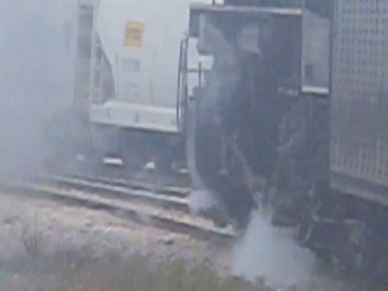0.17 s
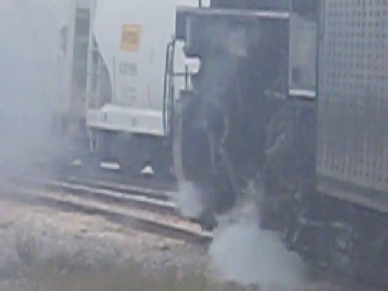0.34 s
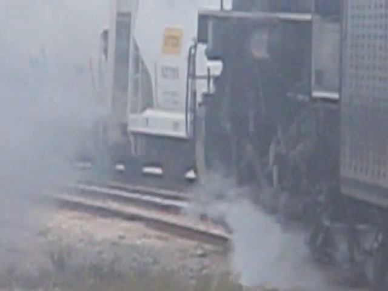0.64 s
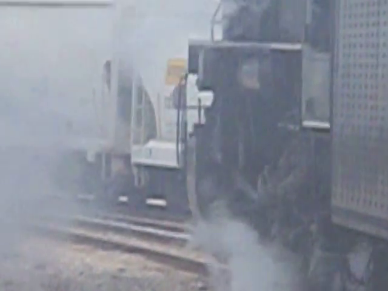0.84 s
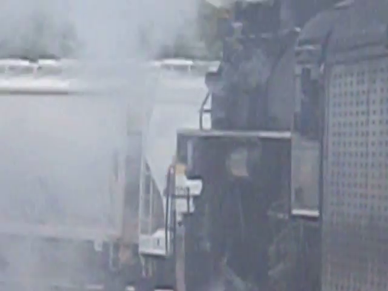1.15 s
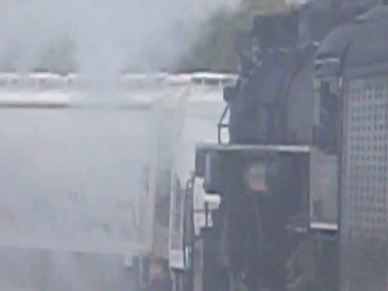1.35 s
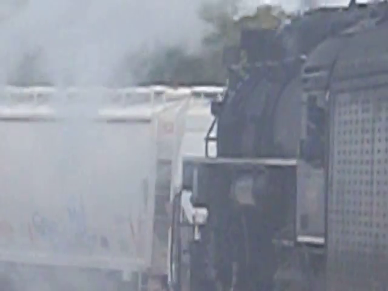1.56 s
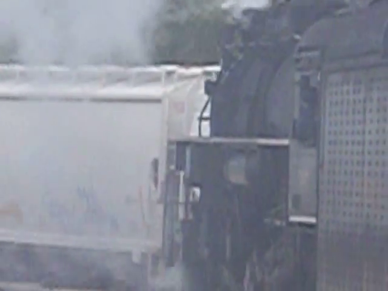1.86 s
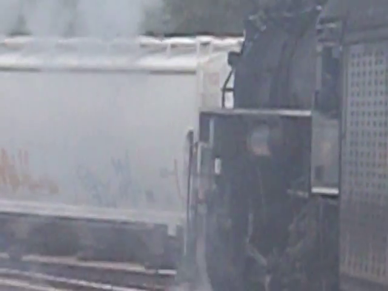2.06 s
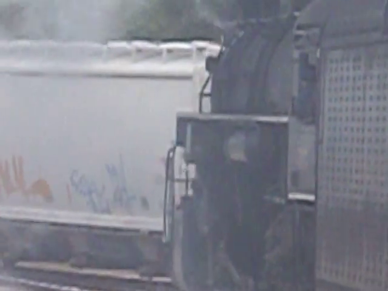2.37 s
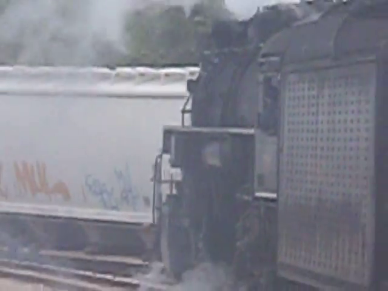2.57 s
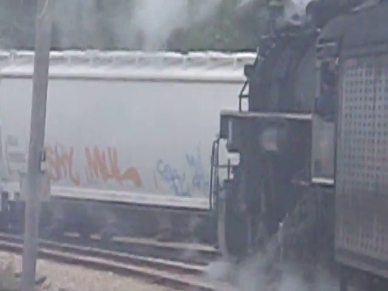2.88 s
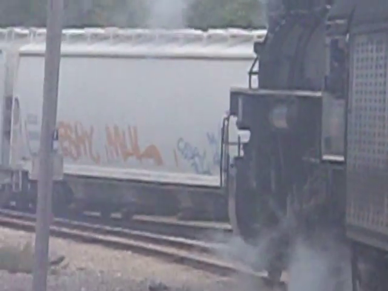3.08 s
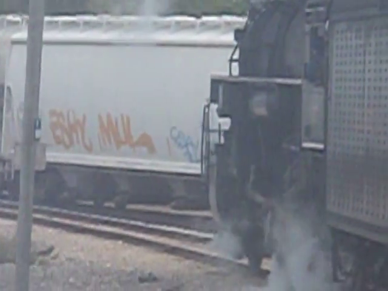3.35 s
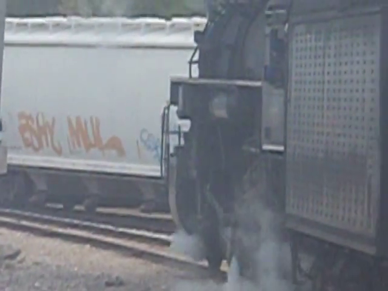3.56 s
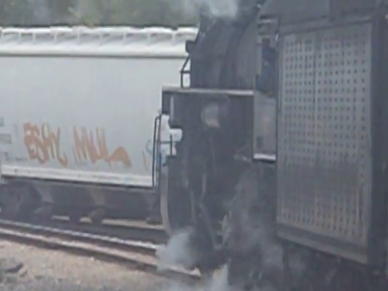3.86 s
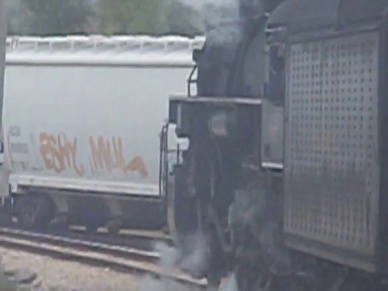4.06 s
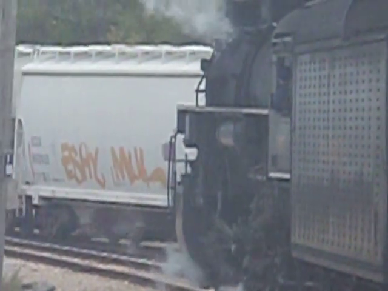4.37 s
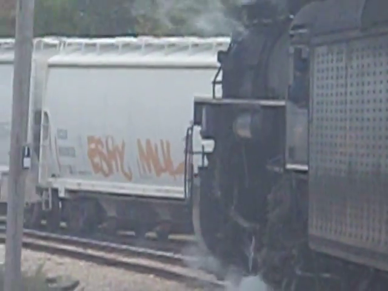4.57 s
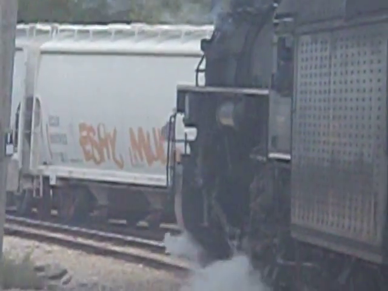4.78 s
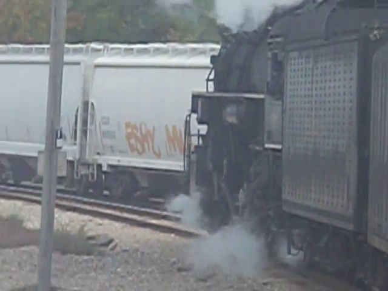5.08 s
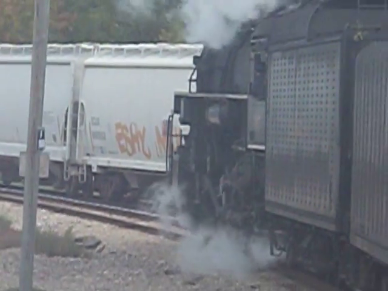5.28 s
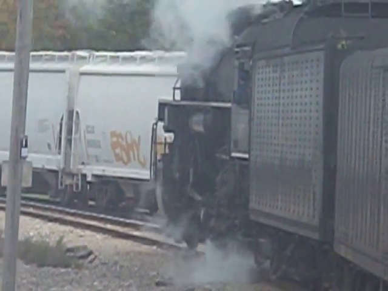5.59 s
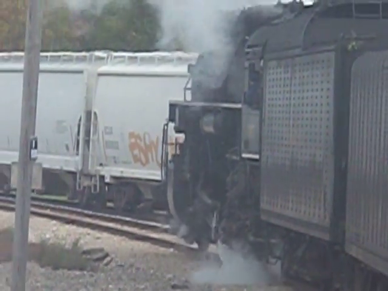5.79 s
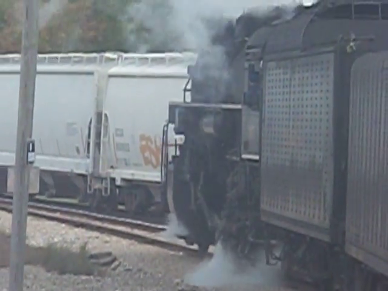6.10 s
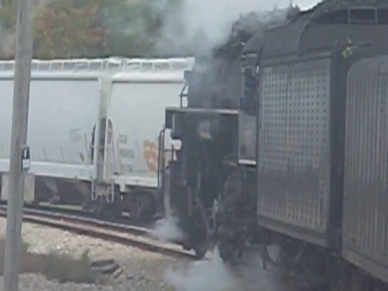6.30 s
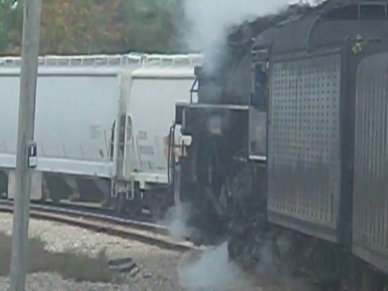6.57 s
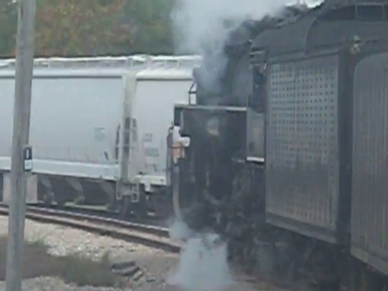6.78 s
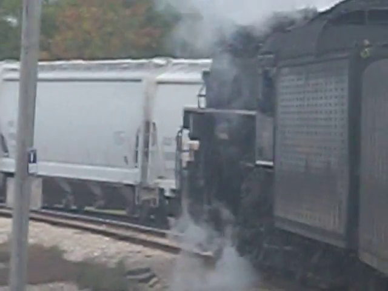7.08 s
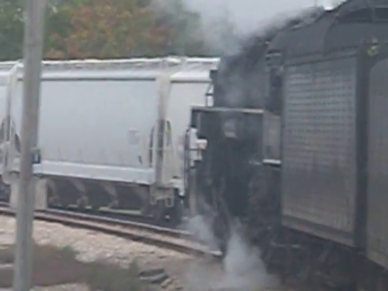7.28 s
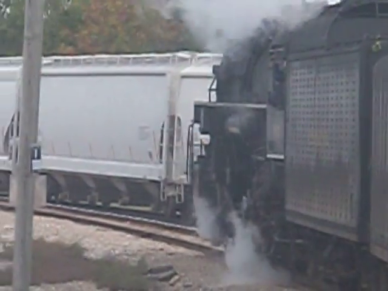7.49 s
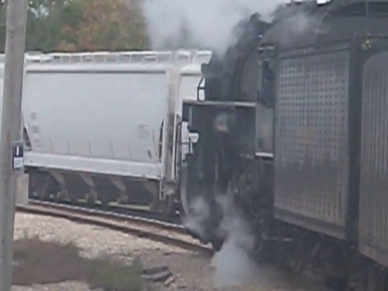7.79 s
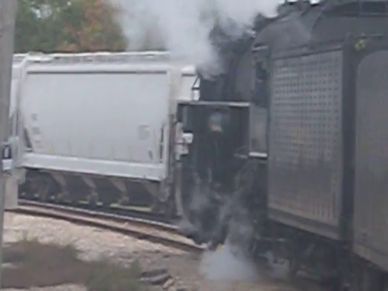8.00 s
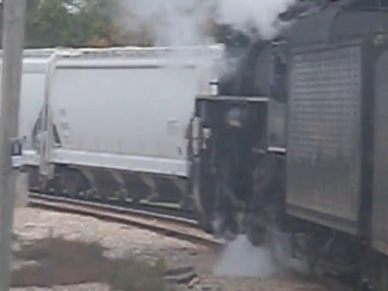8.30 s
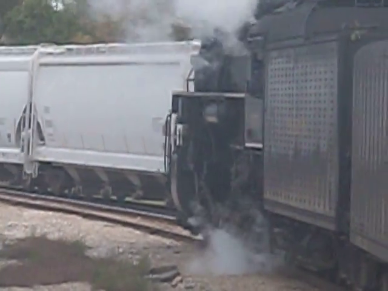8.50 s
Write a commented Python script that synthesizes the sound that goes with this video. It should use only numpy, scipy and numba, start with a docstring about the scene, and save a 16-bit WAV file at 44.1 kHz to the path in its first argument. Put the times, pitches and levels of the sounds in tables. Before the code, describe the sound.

Slow steam engine on curved track: grainy rumble, bright hissing puffs, a high wavering wheel squeal, irregular dull knocks and clinks, wind thumping the microphone.

```python
"""Steam locomotive on a yard curve

One microphone in gusty air hears a steam locomotive creep round a curve in a rail yard.
Wind, rolling and steam are flickering bands of noise; the flange squeal is wavering, blurred tones.
Low thumps of pressure are wind buffets and the low bodies of some knocks. Rods, joints and loose parts
knock, chirp, clink, snap and squeak as short pulses and damped notes.
The whole level dips briefly at set moments, and the left channel lags by a twelfth of a millisecond."""
import sys
import numpy as np
from scipy import signal
from scipy.fft import rfft, irfft, next_fast_len
from scipy.io import wavfile
from scipy.ndimage import uniform_filter1d
from numba import njit

SR = 44100
rng = np.random.default_rng(int(sys.argv[2]) if len(sys.argv) > 2 else 0)


def pcm_store(signal):
    """Save signal as 16-bit PCM."""
    levels = np.round(np.clip(np.atleast_2d(signal), -1, 1) * 32767)
    wavfile.write(sys.argv[1], SR, levels.astype(np.int16).T)


N = 381465  # samples


def undb(db):
    """Decibels to gain."""
    return 10 ** (np.asarray(db) / 20)


def unit(x):
    """Scale to rms 1."""
    return x / np.sqrt(np.mean(x ** 2))


def smooth(x, samples):
    """Two running means in a row."""
    return uniform_filter1d(uniform_filter1d(x, samples), samples)


def curves(table):
    """Columns of a table joined by straight lines in time."""
    times, *columns = np.transpose(table)
    return [np.interp(np.arange(N) / SR, times, column) for column in columns]


@njit
def svf(x, hz, width_hz):
    """State-variable band-pass, gain 1 at the centre."""
    y, band, low = np.empty(len(x)), 0., 0.
    g, damping = np.tan(np.pi * hz / SR), width_hz / hz
    for i in range(len(x)):
        v = (band + g * (x[i] - low)) / (1 + g * (g + damping))
        band, low, y[i] = 2 * v - band, low + 2 * g * v, damping * v
    return y


def walk(rate_hz):
    """Random levels held 1 / rate_hz s and slewed twice; spread near 1."""
    hold = int(SR / rate_hz)
    steps = np.repeat(rng.standard_normal(N // hold + 1), hold)
    return 1.2 * smooth(steps, hold)[:N]


def turbulence(colour, grains_per_s, scatter_db, grain_db, flicker_db, flicker_hz):
    """Noise and uneven grains through third-octave bands that flicker together and alone."""
    colour_hz, colour_db = np.transpose(colour)
    sizes = undb(scatter_db * np.minimum(rng.exponential(size=N), 5.5))
    grains = (rng.random(N) < grains_per_s / SR) * sizes * np.sign(rng.standard_normal(N))
    grains = undb(grain_db) * unit(grains)
    out, shared = 0, walk(flicker_hz)
    octaves = np.log2(colour_hz[-1] / colour_hz[0])
    for f in colour_hz[0] * 2 ** np.arange(0, octaves, 1 / 3):
        band = svf(svf(rng.standard_normal(N) + grains, f, 0.5 * f), f, 0.5 * f)
        band_db = np.interp(np.log(f), np.log(colour_hz), colour_db)
        band_db = band_db + flicker_db * (shared + 0.72 * walk(1.5 * flicker_hz))
        out = out + undb(band_db) * band
    return unit(out)


def swells(rows, rise_s, fall_s, base_db):
    """Gain of a base level plus events that rise, hold and die away, added as power."""
    power, t = undb(base_db) ** 2 + np.zeros(N), np.arange(SR) / SR
    for start_s, length_s, db in rows:
        fall = np.exp(-np.clip(t - length_s, 0, 1) / fall_s)
        shape = np.clip(t / rise_s, 0, 1) * fall
        i = max(int(start_s * SR), 0)
        power[i:i + SR] += (undb(db) * shape[:N - i]) ** 2
    return np.sqrt(power)


def tone(hz, waver_hz, throb_db, rough):
    """A self-excited mode whose pitch wavers and whose level flutters; slip noise blurs it."""
    phase = 2 * np.pi * np.cumsum(hz + waver_hz * walk(60)) / SR
    blur = rough * unit(smooth(rng.standard_normal((2, N)), 260))
    swing = undb(throb_db * walk(60)) + blur[0] + 1j * blur[1]
    return unit((swing * np.exp(1j * phase)).imag)


def ring_fade(t, t60_s, rise_s):
    """A soft onset and an exponential decay by 60 dB in t60_s."""
    return np.exp(-np.log(1000) * t / t60_s) * (1 - np.exp(-t / rise_s))


def bursts(table, rough, spread, glide):
    """Short notes that swell, glide up through their pitch and fade, partly noise around it."""
    out = np.zeros(N)
    for start_s, length_s, hz, db in table:
        t = np.arange(int(length_s * SR)) / SR
        hiss = unit(svf(rng.standard_normal(SR // 4), float(hz), spread * hz))[-len(t):]
        note = np.sin(2 * np.pi * hz * t * (1 + glide * (t / length_s - 1) / 2))
        swell = np.sin(np.pi * (t / length_s) ** 0.69) ** 0.93
        i = int(start_s * SR)
        out[i:i + len(t)] += undb(db) * swell * (note + rough * hiss)
    return out


# uneven wind level under the low thumps: start_s, level_db
WIND_LEVEL = [(0, -16.5), (.08, -17), (.19, -26), (.28, -19), (.65, -16.5), (1.17, -17.5), (1.3, -20),
              (1.8, -19.5), (2.3, -18.5), (2.5, -21), (2.85, -18), (3.3, -16), (3.7, -21), (4.2, -17),
              (4.55, -13), (4.8, -25), (4.96, -13.5), (5.06, -16), (5.13, -18.5), (5.85, -20.5), (6.0, -19),
              (6.85, -18), (7.1, -19), (7.55, -20), (7.93, -17.5), (8.09, -29.5), (8.65, -17.5)]
# spectrum of the wind: frequency_hz, level_db (per Hz, relative)
WIND_COLOUR = [(20, -1), (58, 0.8), (92, -1), (142, -3), (250, -4), (400, -14.5), (900, -25)]
# low thumps of pressure, wind buffets and the low bodies of some knocks:
# centre_s, level_db, pitch_hz, direction (push 1, pull -1)
THUMPS = [(.0305, -7, 200, 1), (0.0621, -6.7, 184, 1), (0.089, -6, 219, 1), (0.2876, -4, 191, 1),
          (0.5358, -1, 197, -1), (0.5603, -9, 125, -1), (0.603, -9, 118, 1), (0.6718, -3, 102, -1),
          (0.843, -4, 120, -1), (0.9404, -5.5, 188, 1), (1.139, -6, 184, 1), (1.1774, -3.5, 149, -1),
          (1.268, -10, 132, -1), (1.6927, -2.5, 206, 1), (2.2865, -6.5, 168, 1), (2.9028, -0.5, 233, -1),
          (3.0094, -11, 160, 1), (3.2559, -9, 121, 1), (3.2936, -7, 125, 1), (3.356, -4, 106, -1),
          (3.433, -5, 180, -1), (3.8087, -7.5, 167, -1), (3.9803, -9, 110, 1), (4.1645, -9, 241, -1),
          (4.212, -2.5, 212, -1), (4.29, -9.1, 168, 1), (4.3142, -2.5, 132, -1), (4.4035, -2, 100, 1),
          (4.426, -8, 185, -1), (4.4513, -5, 189, 1), (4.507, -10, 107, 1), (4.5347, 4, 110, -1),
          (4.5425, -5, 220, 1), (4.5765, -6, 190, -1), (4.647, -7, 131, 1), (4.557, -6, 198, 1),
          (4.6352, -4.5, 205, -1), (4.6836, -9, 128, 1), (4.9594, -2, 262, -1), (4.9959, -8, 148, -1),
          (5.0295, -6, 117, 1), (5.0564, -5, 119, -1), (5.996, -8, 197, -1), (6.0501, -7, 248, -1),
          (6.1708, -9, 145, 1), (6.3226, -8, 116, -1), (6.348, -7.5, 195, 1), (6.4725, -2.5, 132, -1),
          (6.6613, -7.5, 86.5, -1), (6.795, -6, 83, 1), (6.8856, -7, 142, -1), (7.366, -4, 149, -1),
          (7.4454, -7.1, 178, 1), (7.5426, 1, 208, -1), (7.598, -6.5, 180, 1)]
# the low noise swells around each thump: level against the thump, lead, hold and decay
THUMP_DB, THUMP_RISE_S, THUMP_HOLD_S, THUMP_FALL_S = -18, .015, .02, 0.022


def wind_and_thumps():
    """Lumpy low turbulence, with lone pushes and pulls of pressure for buffets and some knocks' bodies."""
    around = [(s - THUMP_RISE_S, THUMP_HOLD_S, db + THUMP_DB) for s, db, hz, way in THUMPS]
    gain = swells(around, THUMP_RISE_S, THUMP_FALL_S, curves(WIND_LEVEL)[0])
    out = gain * turbulence(WIND_COLOUR, 130, 1.6, 0.95, 1.3, 30)
    for centre_s, db, hz, way in THUMPS:
        u, i = np.pi * hz * np.arange(-1000, 1000) / SR, int(centre_s * SR)
        out[i - 1000:i + 1000] += np.sign(way) * undb(db) * (1 - 1.5 * u ** 2) * np.exp(-u ** 2)
    return out


# the train at the microphone, under its knocks and puffs: start_s, rolling_db, steam_db
TRAIN_LEVELS = [(0, -23, -21), (1.0, -24, -18.5), (2.0, -21, -20), (2.22, -23.5, -16), (2.4, -21.5, -18.5),
                (2.9, -25.5, -20), (4.1, -19.5, -20), (4.45, -34, -22), (4.64, -35, -26.5),
                (4.67, -18, -28), (4.72, -20, -18.5), (5.05, -37, -23.5), (5.36, -22, -21.5),
                (5.55, -20.5, -17.5), (5.75, -18, -18), (6.2, -22.5, -19), (6.6, -23.5, -20),
                (7.3, -22.5, -20), (7.9, -22, -16.5), (8.1, -30.5, -17), (8.22, -23, -18.5),
                (8.65, -21.5, -18)]
# spectrum of the rolling wheels: frequency_hz, level_db (per Hz, relative)
ROLLING_COLOUR = [(60, -9.5), (150, -7.5), (300, -4), (600, -4), (1000, -8.5), (1700, -12), (3000, -18)]
# every knock shakes the rolling noise: level against the knock, swell, hold and decay
SHAKE_DB, SHAKE_RISE_S, SHAKE_HOLD_S, SHAKE_FALL_S = -15, 0.004, 0.012, 0.024


def rolling():
    """Wheels rumble on the rail as grainy low noise that swells with every knock."""
    shakes = [(s, SHAKE_HOLD_S, db + SHAKE_DB) for s, db, hz in KNOCKS]
    gain = swells(shakes, SHAKE_RISE_S, SHAKE_FALL_S, curves(TRAIN_LEVELS)[0])
    return gain * turbulence(ROLLING_COLOUR, 300, 2.6, -0.45, 2.5, 18)


# spectrum of the steam: frequency_hz, level_db (per Hz, relative)
STEAM_COLOUR = [(700, -16), (1300, -6.5), (2200, -6), (3000, -0.5), (3700, 0.5), (4500, -1), (5200, -5),
                (6500, -12.5)]
# puffs on top of the hiss: start_s, length_s, level_db
PUFFS = [(.05, 0.024, -14.5), (.14, 0.068, -16.5), (.44, 0.1, -20.5), (.71, 0.072, -17), (1.23, 0.041, -21),
         (1.56, 0.027, -16), (2.41, 0.096, -14), (2.67, 0.056, -22), (3.42, 0.026, -20), (3.54, 0.03, -15),
         (4.1, 0.022, -17), (4.7, 0.1, -16.5), (5.6, 0.098, -15.5), (5.73, 0.021, -18), (5.85, 0.052, -17),
         (6.04, 0.12, -19), (6.88, 0.022, -18), (7.06, 0.084, -16.5), (8.24, 0.022, -23.5),
         (8.41, 0.059, -22)]
PUFF_RISE_S, PUFF_FALL_S = 0.0096, 0.011


def steam():
    """Escaping steam hisses as fine-grained bright turbulence and swells in puffs."""
    gain = swells(PUFFS, PUFF_RISE_S, PUFF_FALL_S, curves(TRAIN_LEVELS)[1])
    return gain * turbulence(STEAM_COLOUR, 1200, 2.65, -0.61, 1.86, 14)


# slow course of the main rim mode: start_s, pitch_hz, level_db
SQUEAL = [(0, 3324, -36), (.4, 3334, -40), (.75, 3325, -33), (.9, 3327, -29), (1.3, 3320, -27.5),
          (2.0, 3320, -26.5), (2.35, 3327, -30.5), (2.55, 3320, -22.5), (3.25, 3322, -25),
          (3.36, 3330, -27), (3.5, 3325, -30), (3.8, 3320, -29.5), (4.3, 3317, -41.5), (4.7, 3330, -37),
          (5.05, 3322, -33.5), (5.27, 3332, -32), (5.55, 3320, -27), (5.7, 3310, -29), (6.0, 3314, -30),
          (6.4, 3322, -36.5), (7.2, 3322, -32), (7.32, 3315, -32), (7.48, 3320, -31), (7.53, 3325, -23),
          (7.75, 3320, -23), (7.98, 3360, -24), (8.05, 3312, -27), (8.25, 3315, -30), (8.36, 3318, -32),
          (8.65, 3344, -21)]
# other rim modes, one pitch_hz each: close neighbour, low, high, top
RIM_HZ = [3368, 2263, 4124, 4500]
# the flange grips and the main mode rings out: start_s, length_s, level_db
GRIPS = [(.92, 0.091, -23.5), (1.03, 0.068, -22), (1.135, 0.025, -18), (1.36, 0.054, -18),
         (1.505, 0.03, -15), (1.63, 0.041, -22), (1.74, 0.028, -20), (1.835, 0.02, -20),
         (1.935, 0.047, -16.5), (2.075, 0.1, -17), (2.2, 0.1, -18), (2.635, 0.07, -17.5),
         (2.74, 0.057, -21), (2.85, 0.057, -20), (3.055, 0.055, -19.5), (3.145, 0.036, -18.5),
         (3.27, 0.04, -26), (3.435, 0.036, -21.5), (3.545, 0.013, -24), (5.285, 0.027, -16.5),
         (5.345, 0.17, -20.5), (5.68, 0.022, -23), (5.74, .05, -27), (5.86, .02, -27), (7.3, 0.038, -23),
         (7.42, 0.028, -25), (7.515, 0.044, -23.5), (7.6, 0.09, -20), (7.66, .03, -22),
         (7.835, 0.07, -21.5), (7.975, 0.018, -14), (8.41, 0.021, -18), (8.52, 0.082, -28)]
GRIP_RISE_S, GRIP_FALL_S = 0.02, 0.022
# spells when the low rim mode catches: start_s, length_s, level_db
LOW_RIM_SPELLS = [(1.5, 0.22, -33), (2.08, 0.22, -27), (2.65, 0.07, -34), (2.87, 0.036, -28),
                  (3.01, 0.15, -33), (3.92, 0.064, -27), (4.1, 0.29, -37), (5.4, 0.039, -34),
                  (5.62, 0.77, -35.5), (5.63, 0.038, -24), (5.715, 0.024, -31), (6.3, 0.048, -27.5),
                  (6.7, 0.18, -35), (7.81, 0.067, -24), (7.98, 0.13, -32), (8.46, 0.27, -29)]
SPELL_RISE_S, SPELL_FALL_S = 0.03, 0.019
LOW_RIM_DB, HIGH_RIM_DB = -38, -35  # base levels of the weaker modes


def squeal():
    """Stick-slip at the flange locks on to rim modes; a close neighbour beats against the main one."""
    main_hz, main_db = curves(SQUEAL)
    next_hz, low_hz, high_hz, top_hz = RIM_HZ
    main = tone(main_hz, 8., 1.5, .26) + undb(-8) * tone(next_hz, 22., 4., .3)
    low = tone(low_hz, 6., 2.6, 0.92) + undb(-3.5) * tone(low_hz, 70., 2.8, 1.0)
    high = tone(high_hz, 5., 3.9, 0.41) + undb(-3.0) * tone(top_hz, 14.0, 2.7, .8)
    main_gain = swells(GRIPS, GRIP_RISE_S, GRIP_FALL_S, main_db)
    low_gain = swells(LOW_RIM_SPELLS, SPELL_RISE_S, SPELL_FALL_S, LOW_RIM_DB)
    return main_gain * main + low_gain * low + undb(HIGH_RIM_DB) * high


RATTLES_PER_S, RATTLE_LOW_HZ, RATTLE_OCTAVES = 45, 700, 2.9
RATTLE_DB, RATTLE_SCATTER_DB, RATTLE_RISE_S, RATTLE_T60_S = -24, 1.8, 0.0022, .09


def rattle():
    """Loose parts of the running gear ring faintly and briefly, each on its own note."""
    out, t = np.zeros(N + SR // 4), np.arange(SR // 4) / SR
    fade = ring_fade(t, RATTLE_T60_S, RATTLE_RISE_S)
    for when, pitch, size in rng.random((int(RATTLES_PER_S * N / SR), 3)):
        hz, i = RATTLE_LOW_HZ * 2 ** (RATTLE_OCTAVES * pitch), int(when * N)
        db = RATTLE_DB - RATTLE_SCATTER_DB * np.log(1 - .95 * size)
        out[i:i + len(t)] += undb(db) * fade * np.sin(2 * np.pi * hz * t)
    return out[:N]


# dull knocks of rods and rail joints, with their bounces: start_s, level_db, pitch_hz
KNOCKS = [(.0863, 0, 1000), (.096, -8, 900), (0.2847, -5, 330), (0.2886, -4, 450), (.942, -7.5, 553),
          (.9467, -4, 500), (1.1878, -6.5, 800), (1.19, -12, 1100), (1.1948, -5.5, 1000), (1.248, -6, 1840),
          (1.434, -2.5, 700), (1.4445, -3.5, 400), (1.861, -5.5, 483), (1.962, -3.5, 1070), (2.36, -6, 623),
          (2.3712, -10, 500), (2.421, -6, 602), (2.5517, -4, 700), (2.5555, -6.5, 604), (3.092, -7, 844),
          (3.239, -8.5, 415), (3.4819, -3.5, 720), (3.4875, -10, 900), (4.003, -5.5, 740),
          (4.1592, -1.5, 800), (4.165, -5, 420), (4.174, -4.5, 447), (4.5537, -7, 716), (5.024, -5.5, 400),
          (5.1172, -10, 1100), (5.1205, -9, 1500), (5.414, -9.5, 400), (5.528, -13, 600),
          (5.8098, 1.5, 486), (5.817, 1.5, 480), (5.928, -8, 680), (6.0462, -3, 500), (6.0499, -12, 380),
          (6.332, -9, 596), (6.5025, -0.5, 396), (6.7062, -9, 2100), (6.83, -10, 750), (7.0203, -2.5, 800),
          (7.027, -5, 550), (7.04, -8.5, 348), (7.064, -5.5, 330), (7.435, -7.5, 605), (8.1846, 0, 654),
          (8.1965, -12, 750), (8.2025, -10, 650), (8.423, -5, 520)]
KNOCK_RISE_CYCLES, KNOCK_FALL_CYCLES, KNOCK_LAG_CYCLES = .28, .65, 0.22
KNOCK_RING_DB, KNOCK_RING_S, KNOCK_RING_WIDTH = -16, .012, .5  # width as a share of the pitch


def knocks():
    """Each knock is a pulse of a cycle or two that opens with a dip of pressure, then rings roughly."""
    out, t = np.zeros(N), np.arange(-400, 2600) / SR
    for start_s, db, hz in KNOCKS:
        u = hz * t - KNOCK_LAG_CYCLES
        rise, fall = np.exp(-(u / KNOCK_RISE_CYCLES) ** 2), np.exp(-u / KNOCK_FALL_CYCLES)
        pulse = np.where(u < 0, rise, fall) * np.cos(2 * np.pi * hz * t)
        ring = unit(svf(rng.standard_normal(len(t)), float(hz), KNOCK_RING_WIDTH * hz))
        ring = ring * np.clip(u - 1, 0, 1) * np.exp(-t / KNOCK_RING_S)
        i = int(start_s * SR)
        out[i - 400:i + 2600] -= undb(db) * (pulse + undb(KNOCK_RING_DB) * ring)
    return out


# brief slips that chirp on one note: start_s, length_s, pitch_hz, level_db
CHIRPS = [(.135, 0.055, 4150, -18), (1.235, 0.049, 4160, -21), (1.755, .035, 3674, -26),
          (3.529, .009, 4130, -15), (3.543, 0.0093, 4170, -14), (3.559, .01, 4230, -9),
          (3.568, .02, 4230, -14), (4.775, .035, 4820, -14), (5.847, 0.038, 4220, -13),
          (6.7, .02, 4700, -15), (7.072, .03, 3890, -13.5), (8.005, .045, 2880, -18.5),
          (8.08, .035, 2040, -22), (8.105, .085, 1100, -22), (8.135, .03, 2980, -13.5),
          (8.25, 0.024, 4150, -12)]


def chirps():
    """Brief slips sound narrow, slightly rising notes with a little noise."""
    return bursts(CHIRPS, rough=.4, spread=0.041, glide=.045)


# bright clinks of couplings and spits of steam: start_s, level_db, pitch_hz
CLINKS = [(0.1376, -9.5, 2800), (0.7063, -10, 2770), (1.2341, -23, 3340), (1.5494, -15, 3370),
          (1.7644, -11.5, 3310), (2.2508, -8.5, 3360), (2.4189, -11, 3310), (2.4894, -16, 3450),
          (2.7312, -16, 3270), (3.5319, -12, 4280), (4.1599, -13, 3310), (4.2594, -12, 3120),
          (4.7102, -7.5, 3150), (5.6194, -15, 3410), (6.0694, -8.5, 3360), (6.5094, -10, 3280),
          (6.5864, -11, 4100), (6.7052, -11.5, 3760), (6.7994, -10, 3460), (7.0643, -8, 3050),
          (7.6809, -28, 3340), (7.7827, -15, 3340), (7.9473, -11, 3350), (8.2556, -11, 4150)]
CLINK_T60_S, CLINK_RISE_S = 0.086, 0.01
CLINK_RING_DB, CLINK_CRACK_DB = -1.5, 5.0  # note and broad burst, against the table's level


def clinks():
    """Each event rings a damped note and throws a broad burst that dies with it."""
    out, t = np.zeros(N), np.arange(SR // 4) / SR
    fade = ring_fade(t, CLINK_T60_S, CLINK_RISE_S)
    for start_s, db, hz in CLINKS:
        noise = rng.standard_normal(len(t))
        ring = np.sin(2 * np.pi * hz * t) + .5 * unit(svf(noise, float(hz), 1.3 * hz))
        crack = unit(svf(noise, 1600.0, 3800.0))
        blow = fade * (undb(CLINK_RING_DB) * ring + undb(CLINK_CRACK_DB) * crack)
        i = int(start_s * SR)
        out[i:i + len(t)] += undb(db) * blow[:N - i]
    return out


# brief dips of the whole level: start_s, depth_db, length_s
DIPS = [(0.307, 4, 0.11), (1.289, 4.5, 0.16), (1.45, 2.5, 0.1), (1.778, 4, 0.066), (2.44, 5.5, 0.23),
        (2.942, 4.5, 0.046), (3.309, 4.5, 0.17), (4.543, 3, 0.076), (4.795, 2.5, 0.15), (5.119, 6.5, 0.24),
        (5.815, 8.5, 0.037), (6.348, 4.5, 0.07), (8.184, 4.5, 0.053)]
DIP_FALL_S, DIP_CURVE = 0.0051, 3.1


def dips():
    """Gain at set moments: the level drops quickly, stays low and recovers ever faster."""
    t, drop_db = np.arange(N) / SR, np.zeros(N)
    for start_s, depth_db, length_s in DIPS:
        fall = np.clip((t - start_s) / DIP_FALL_S, 0, 1)
        drop_db += depth_db * fall * (1 - np.clip((t - start_s) / length_s, 0, 1) ** DIP_CURVE)
    return undb(-drop_db)


# very short hard snaps of metal: start_s, length_s, pitch_hz, level_db
SNAPS = [(.9452, 0.0013, 3900, -1), (1.7648, 0.002, 3940, -5), (2.7321, .0015, 3040, 0),
         (2.7342, 0.00139, 3850, 0), (3.5565, 0.0025, 4000, -7), (4.1636, 0.002, 3490, -6),
         (5.1158, 0.0012, 5130, 6), (5.1174, 0.0016, 4500, 4), (5.1195, .003, 3800, -8)]


def snaps():
    """Hard metal snaps last a few cycles and are broadly noisy."""
    return bursts(SNAPS, rough=.7, spread=0.78, glide=0.14)


# a dry joint squeaks once: start_s, slip_rate_hz, level_db
SQUEAK = [(7.93, 945, -50), (7.95, 950, -27), (7.968, 965, -33), (7.982, 995, -26), (8.055, 988, -26),
          (8.068, 978, -30), (8.12, 978, -28), (8.165, 975, -29), (8.19, 965, -45)]
# partials of the squeak from the slip rate up: level_db
SQUEAK_PARTIALS_DB = [-4, -4, 2, 4, 4]


def squeak():
    """Uneven slips give a short stack of blurred partials, each throbbing alone."""
    slip_hz, db = curves(SQUEAK)
    out = np.zeros(N)
    for k, partial_db in enumerate(SQUEAK_PARTIALS_DB, start=1):
        out += undb(partial_db) * tone(k * slip_hz, waver_hz=5. * k, throb_db=2.5, rough=.3)
    return undb(db) * out


LEFT_LAG_S = 1 / 12000


def scene():
    """All sources reach one microphone, copied to two channels with the left one late."""
    mono = wind_and_thumps() + rolling() + steam() + squeal() + rattle()
    mono = mono + knocks() + chirps() + clinks() + snaps() + squeak()
    mono = mono * dips()
    size = next_fast_len(N + 99)
    # a phase slope delays by a fraction of a sample
    lag = np.exp(-2j * np.pi * np.fft.rfftfreq(size, 1 / SR) * LEFT_LAG_S)
    left = irfft(rfft(mono, size) * lag, size)[:N]
    return np.array([left, mono])


TOP_HZ = 5690


def record(dry):
    """The camera microphone's chain rounds the loudest peaks and cuts the top steeply."""
    rounded = dry / (1 + np.abs(dry) ** 4.5) ** (1 / 5.34)
    top_cut = signal.ellip(16, .2, 80, TOP_HZ, fs=SR, output="sos")
    return signal.sosfilt(top_cut, rounded)


dry = scene()
out = record(dry)
pcm_store(out)
```